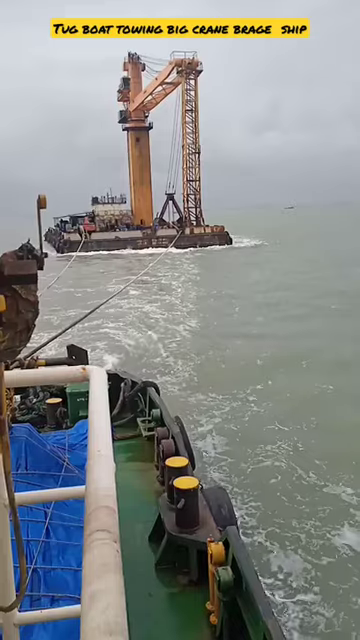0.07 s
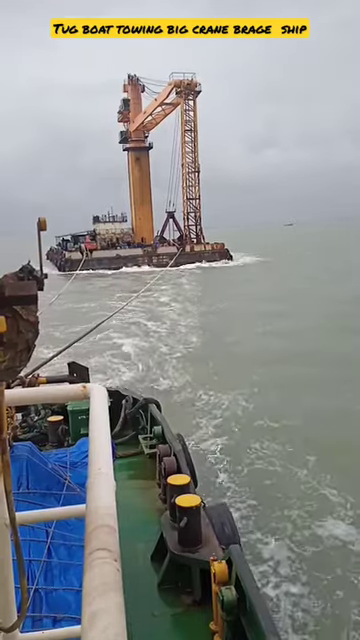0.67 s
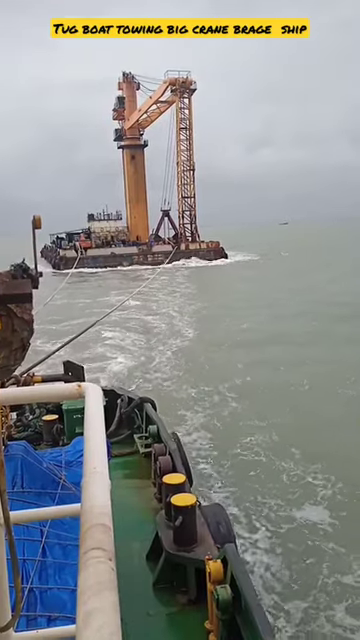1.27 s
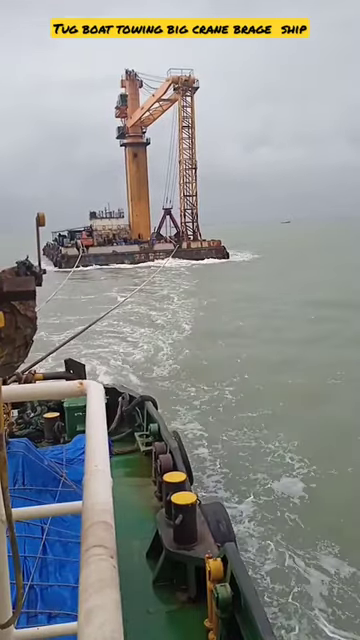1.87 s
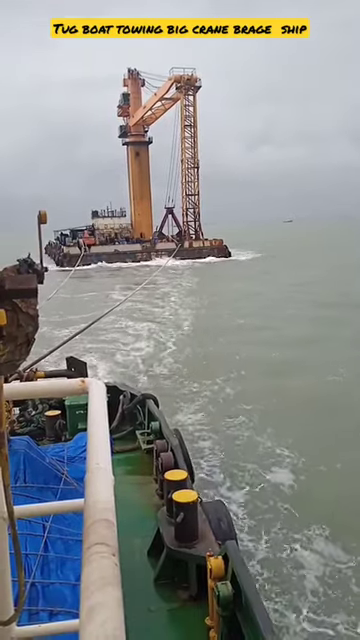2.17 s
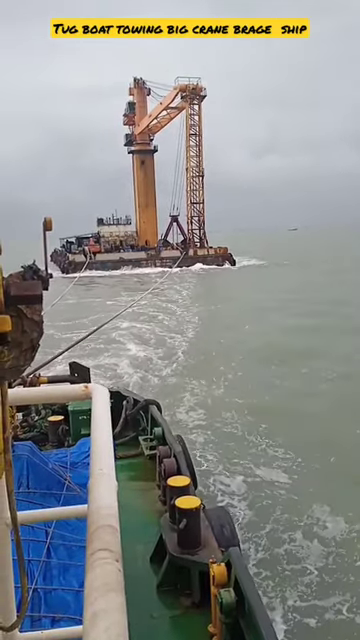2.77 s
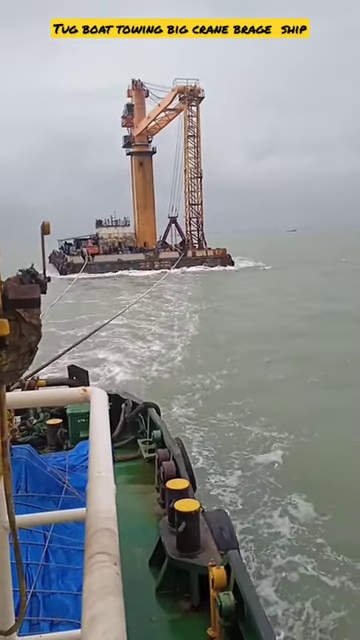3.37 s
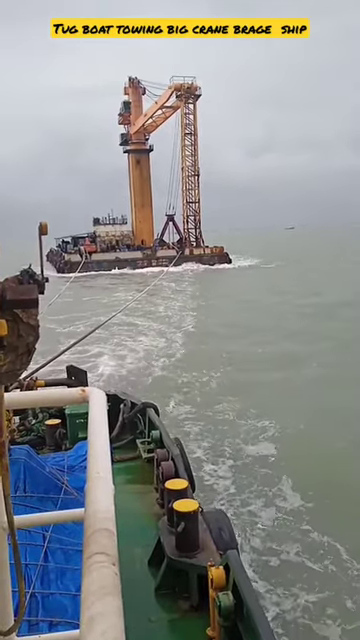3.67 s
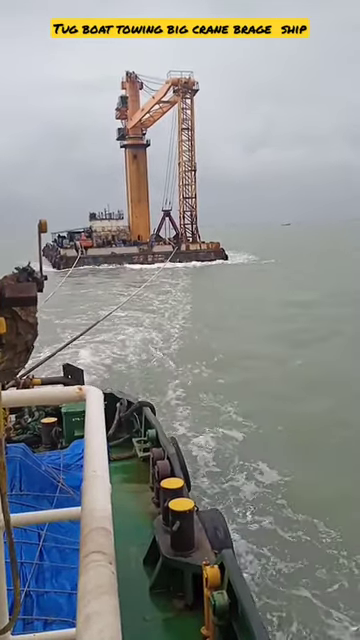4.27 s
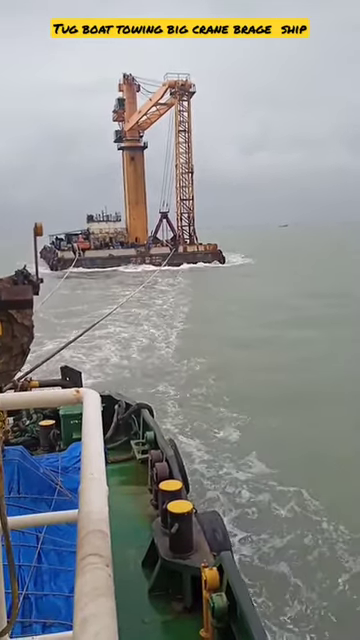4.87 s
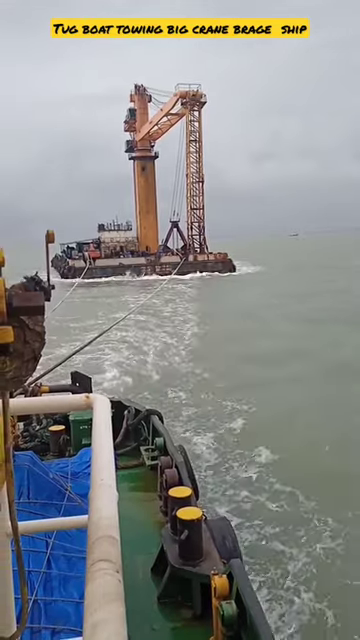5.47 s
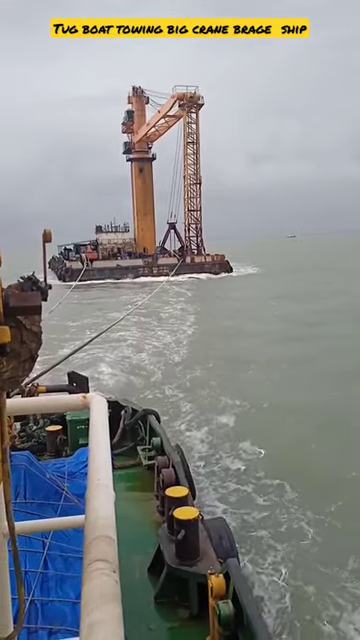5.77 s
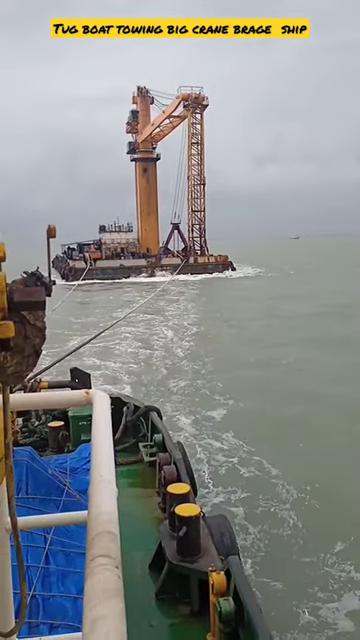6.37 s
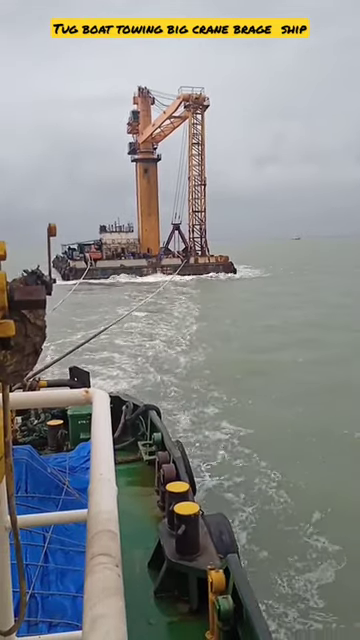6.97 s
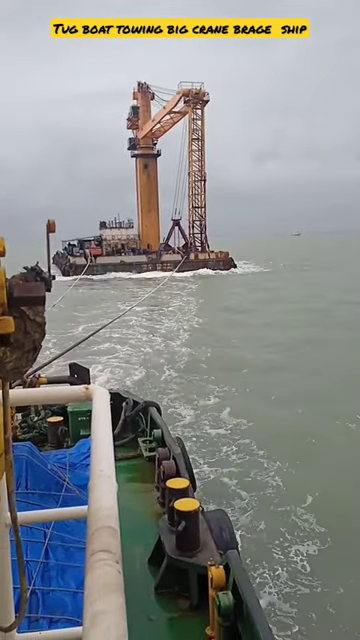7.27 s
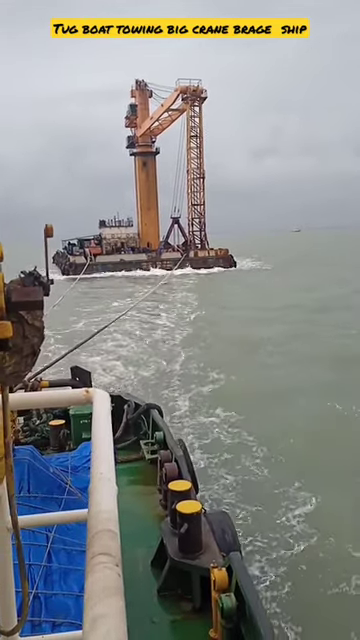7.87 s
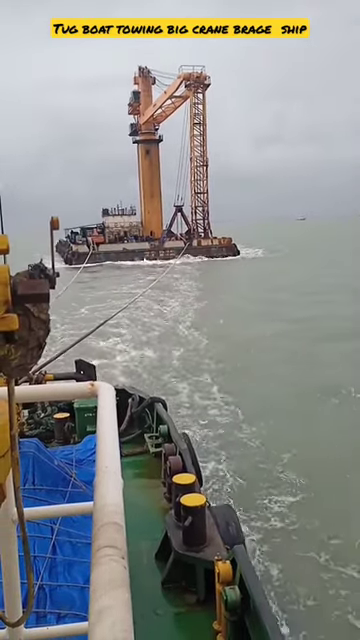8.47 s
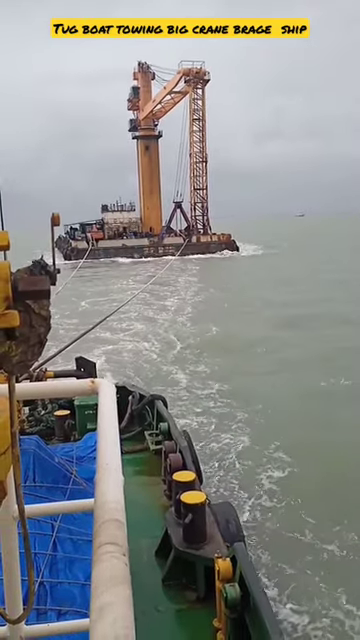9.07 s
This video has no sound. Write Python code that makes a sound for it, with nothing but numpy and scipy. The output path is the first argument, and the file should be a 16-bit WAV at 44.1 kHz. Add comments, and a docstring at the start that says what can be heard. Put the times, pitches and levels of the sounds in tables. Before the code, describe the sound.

Low, pulsing boat engines rumble with a faint whine, gusts of wind and light splashes of water.

```python
"""On deck, tugboat towing a barge

One microphone in the open air, close to the engines. Two diesels run at almost the same speed, so their
exhaust notes throb about three times a second, under a steady gear whine and the engine room's roar.
Wind buffets and bumps the microphone; the wake fizzes and splashes along the hull. The sound fades in."""
import sys
import numpy as np
from scipy import signal
from scipy.fft import rfft, irfft, next_fast_len
from scipy.io import wavfile
from scipy.ndimage import uniform_filter1d, map_coordinates

SR = 44100
rng = np.random.default_rng(int(sys.argv[2]) if len(sys.argv) > 2 else 0)


def unload_audio(sound):
    """Save the sound as a 16-bit wav file, at the path given as the first command line argument."""
    columns = np.transpose(np.atleast_2d(sound))
    # keep every value between -1 and 1, then stretch to whole-number steps
    steps = np.round(np.clip(columns, -1, 1) * 32767)
    wavfile.write(sys.argv[1], SR, steps.astype(np.int16))


N = 402191

FIRING_ORDER, WHINE_ORDER = 6, 42  # firings and whine cycles per turn of the shaft
# Rushing water and fine spray as the microphone colours them, with its resonance near 15 kHz:
# frequency_hz, relative_db
WASH_SPECTRUM = [(1500, -11), (2800, 3), (3500, -2), (4050, -2.5), (4800, -5), (5600, 2.5), (6000, 0),
                 (6600, 3), (7300, -0.5), (8200, -8.5), (11000, -17.5), (16000, -36)]
SPRAY_SPECTRUM = [(2500, -19), (6000, -4.5), (8500, -1.5), (10500, -3.5), (12200, 0.5), (12900, 3),
                  (13300, -1.5), (14000, 0), (14700, 11.5), (15500, 10)]


def amp(db):
    """Decibels to gain."""
    return 10 ** (np.asarray(db) / 20)


def unit(x):
    """Scale to rms 1."""
    return x / np.sqrt(np.mean(x ** 2) + 1e-20)


def curves(rows):
    """One value per sample for each column after the time."""
    times, *columns = np.transpose(rows)
    return [np.interp(np.arange(N) / SR, times, column) for column in columns]


def wobble(rate):
    """A smooth random curve, rate knots a second."""
    knots = rng.standard_normal(int(N * rate / SR) + 4)
    fine = np.arange(10 * len(knots)) / 10
    return np.interp(np.arange(N) * rate / SR, fine, map_coordinates(knots, [fine]))


def filtered(x, response):
    """Filter x by a gain given as a function of frequency."""
    size = next_fast_len(N + SR // 2)
    return irfft(rfft(x, size) * response(np.fft.rfftfreq(size, 1 / SR)), size)[:N]


def coloured(x, spectrum):
    """x shaped by (Hz, dB) points on a log axis, at rms 1."""
    hz, db = np.transpose(spectrum)
    return unit(filtered(x, lambda f: amp(np.interp(np.log(f + 1), np.log(hz), db))))


def noise():
    """White noise of rms 1."""
    return rng.standard_normal(N)


def patchy(depth_db):
    """White noise whose level varies in small patches of time and frequency."""
    spectrogram = signal.stft(noise(), nperseg=512)[2]
    patches = uniform_filter1d(rng.standard_normal(spectrogram.shape), size=4, axis=0)
    patches = uniform_filter1d(patches, size=5, axis=1)
    return signal.istft(spectrogram * amp(depth_db * unit(patches)), nperseg=512)[1][:N]


def add(track, start_s, sound):
    """Mix a short sound into the track."""
    part = track[round(start_s * SR):][:len(sound)]
    part += sound[:len(part)]


def sea():
    """Gains of wash and spray: the churning wake, plus waves that build to a crest and drain away."""
    # How hard the wake churns: time_s, wash_db
    churn = [(0.4, -68), (1.3, -69.5), (2.6, -67.5), (3.5, -69.5), (4.8, -67.5), (5.7, -67.5), (6.5, -68),
             (7.4, -65.5), (7.9, -68.5), (9.1, -67)]
    # Waves breaking against the hull: crest_s, rise_s, fall_s, wash_db, spray_db
    waves = [(0.48, 0.09, 0.068, -69, -77.5), (1.73, .07, .05, -64, -70), (4.05, .17, 0.23, -57, -60.5),
             (4.39, 0.065, .13, -62.5, -72), (5.58, .04, .17, -64, -60.5), (8.34, .04, .06, -60, -68),
             (8.8, .13, .13, -67, -62), (9.03, 0.022, 0.065, -80, -63.5)]
    calm_wash_db, calm_spray_db, spray_db_per_db = -68, -74, 1.7  # spray grows faster than wash
    t = np.arange(N) / SR
    churn_db, = curves(churn)
    wash_power = amp(churn_db) ** 2
    spray_power = amp(calm_spray_db + spray_db_per_db * (churn_db - calm_wash_db)) ** 2
    for crest_s, rise_s, fall_s, wash_db, spray_db in waves:
        crest = np.exp(-np.abs(t - crest_s) / np.where(t < crest_s, rise_s, fall_s))
        wash_power += (amp(wash_db) * crest) ** 2
        spray_power += (amp(spray_db) * crest) ** 2
    return np.sqrt(wash_power), np.sqrt(spray_power)


def bubbles(per_s, pitch_hz, spread_db, cycles):
    """Bursting foam: each bubble rings for a few cycles at its own pitch, some far louder than most."""
    count = int(per_s * N / SR)
    when, size = rng.random((2, count))
    hz = np.clip(pitch_hz * np.exp(.35 * rng.standard_normal(count)), 1000, SR / 2.5)[:, None]
    age = np.arange(SR // 250)
    gain = amp(spread_db * np.minimum(-np.log(1 - size), 4))[:, None]
    rings = gain * np.sin(2 * np.pi * hz * age / SR) * np.exp(-hz * age / SR / cycles)
    where = (when * N).astype(int)[:, None] + age
    return unit(np.bincount(where.ravel(), rings.ravel(), N)[:N])


def wake(wash_trim_db, spray_trim_db, wash_foam_db, spray_foam_db):
    """Churned water rushes and sloshes along the hull, with foam bursting on top."""
    wash_gain, spray_gain = sea()
    slosh = wobble(22)
    foam = bubbles(per_s=1100, pitch_hz=8030, spread_db=2.5, cycles=4.9)
    rush = patchy(depth_db=1.7) * amp(wobble(90)) + amp(wash_foam_db) * foam
    fizz = patchy(depth_db=2.5) * amp(2.8 * wobble(160)) + amp(spray_foam_db) * foam
    wash = wash_gain * amp(wash_trim_db + 0.5 * slosh) * coloured(rush, WASH_SPECTRUM)
    spray = spray_gain * amp(spray_trim_db + 0.3 * slosh) * coloured(fizz, SPRAY_SPECTRUM)
    return wash + spray


def splashes(trim_db, t60_s):
    """Thrown water lands with short, bright spats."""
    # Water landing: start_s, level_db
    landings = [(1.73, -53), (4.34, -46.5), (5.0665, -49.5), (5.21, -52), (5.5638, -37), (5.94, -50),
                (6.01, -49.5), (6.9536, -53), (8.2641, -50.5), (8.8037, -43.5), (8.9, -50), (9.0236, -43),
                (9.0733, -43.5)]
    envelope = np.zeros(N)
    t = np.arange(SR // 8) / SR
    attack = 1 - np.exp(-t / .001)
    for start_s, level_db in landings:
        add(envelope, start_s, amp(level_db + trim_db - 60 * t / t60_s) * attack)
    return envelope * unit(coloured(noise(), SPRAY_SPECTRUM) + 0.36 * coloured(noise(), WASH_SPECTRUM))


def drips(t60_s):
    """A large falling drop traps an air bubble that rings briefly."""
    # The drop's plink: start_s, peak_db, pitch_hz
    plinks = [(4.055, -34, 2600)]
    out = np.zeros(N)
    t = np.arange(SR // 20) / SR
    for start_s, peak_db, pitch_hz in plinks:
        add(out, start_s, amp(peak_db - 60 * t / t60_s) * np.sin(2 * np.pi * pitch_hz * t))
    return out


def wind(trim_db, gust_trim_db, lumpy_db, spiky_db):
    """Wind and gusts buffet the microphone; the turbulence comes in lumps with brief pressure spikes."""
    # Wind between gusts: time_s, level_db
    breeze = [(0.4, -31.5), (2.7, -31.5), (3.2, -31.5), (4.4, -32.5), (4.9, -32.5), (6.85, -34.5),
              (7.6, -29.5), (8.05, -28.5), (8.4, -32), (9.1, -38)]
    # Gusts that swell and die: crest_s, length_s, level_db
    gusts = [(0.522, 0.097, -27.5), (1.153, .14, -29), (2.27, 0.12, -29), (3.777, 0.077, -26),
             (4.42, 0.34, -30), (4.64, 0.24, -29.5), (5.15, 0.18, -29), (5.41, .14, -31.5),
             (5.69, .18, -25), (6.303, 0.095, -29.5), (6.566, 0.3, -27.5), (7.022, 0.063, -21.5),
             (7.29, 0.22, -27), (7.627, 0.16, -25.5), (7.836, .1, -22.5), (7.957, .12, -20),
             (8.164, 0.049, -24), (8.644, 0.15, -31.5)]
    # Buffeting at the microphone: frequency_hz, relative_db
    buffet_spectrum = [(20, -31.5), (35, -22), (60, -11.5), (85, 0.5), (105, 1), (150, -2.5), (240, -6),
                       (350, -11.5), (500, -17), (800, -29), (1400, -40.5), (3000, -76)]
    t = np.arange(N) / SR
    breeze_db, = curves(breeze)
    power = amp(breeze_db) ** 2
    for crest_s, length_s, level_db in gusts:
        power += amp(level_db + gust_trim_db) ** 2 * np.exp(-(2 * (t - crest_s) / length_s) ** 2)
    eddies = noise() * amp(lumpy_db * wobble(30) + spiky_db * wobble(300))
    return amp(trim_db) * np.sqrt(power) * coloured(eddies, buffet_spectrum)


def bumps(trim_db, pop_hz, thud_hz):
    """A strong eddy gives a sharp suction dip inside a broader one, flanked by pressure humps."""
    # Eddies hitting the microphone: centre_s, pop_db, thud_db
    hits = [(1.128, -30, -24), (2.241, -31.5, -27), (2.302, -25, -21), (2.388, -42, -24), (3.571, -24, -28),
            (3.668, -29.5, -30), (4.658, -24, -21), (5.699, -29, -29), (6.548, -25.5, -30),
            (6.635, -28, -28), (7.4, -28, -23), (7.812, -26.5, -19), (7.984, -21.5, -17),
            (8.165, -27.5, -19.5)]
    out = np.zeros(N)
    t = np.arange(-SR // 50, SR // 50) / SR
    dip = lambda hz: (2 * (np.pi * hz * t) ** 2 - 1) * np.exp(-(np.pi * hz * t) ** 2)
    for centre_s, pop_db, thud_db in hits:
        add(out, centre_s + t[0], amp(pop_db) * dip(pop_hz) + amp(thud_db) * dip(thud_hz))
    return amp(trim_db) * out


def engine_room(level_db, clatter_db):
    """The engine room's roar, with a few narrow, fuzzy engine hums above it."""
    # The roar as heard on deck: frequency_hz, relative_db
    room_spectrum = [(150, -18), (400, 4.5), (650, -2.5), (880, 2.5), (1000, -3.5), (1380, -2.5),
                     (1530, 0.5), (1780, -1.5), (2000, -7.5), (2400, -14), (3000, -20), (3550, -27),
                     (4050, -22.5), (5000, -29), (9000, -57)]
    # Narrow, fuzzy engine hums: pitch_hz, width_hz, level_db
    hums = [(371.3, 15, -49.5), (1546, 73, -59), (1754, 18, -60)]
    roar = patchy(depth_db=2.0) * amp(clatter_db * wobble(250))
    out = amp(level_db) * coloured(roar, room_spectrum)
    for pitch_hz, width_hz, hum_db in hums:
        hum = filtered(noise(), lambda f: 1 / (1 + (2 * (f - pitch_hz) / width_hz) ** 2))
        out += amp(hum_db) * unit(hum)
    return out


def whine(turns, trim_db, waver_db, drift_cycles):
    """The gearing sings on one high order of its shaft, wavering in level and phase."""
    # Strength of the whine: time_s, level_db
    strength = [(0.4, -48.5), (0.65, -46), (1.45, -51), (2.7, -45.5), (3.8, -50), (4.3, -48.5), (7.4, -47),
                (9.1, -49)]
    level_db, = curves(strength)
    tone = unit(np.sin(2 * np.pi * (WHINE_ORDER * turns + drift_cycles * wobble(5))))
    return amp(level_db + trim_db + waver_db * wobble(11)) * tone


def exhaust_rumble(throb_db, level_db, throb_share, lumpy_db):
    """Turbulent exhaust gas rumbles in random lumps and partly follows the throb."""
    # Exhaust noise: frequency_hz, relative_db
    exhaust_spectrum = [(20, -33.5), (35, -21.5), (62, -2), (85, -3.5), (105, 2.5), (130, -4.5),
                        (160, -9.5), (250, -10.5), (400, -28.5), (600, -22), (1000, -50.5), (2000, -63.5)]
    gain = amp(level_db + throb_share * throb_db + lumpy_db * wobble(16))
    return gain * coloured(noise(), exhaust_spectrum)


def shaft_turns(speed, in_step_s=3.97):
    """Turns of a crankshaft, counted from a moment when both engines fire together."""
    turns = np.cumsum(speed) / SR
    return turns - turns[round(in_step_s * SR)]


def diesel(turns, tones, swell_db):
    """Tones locked to one crankshaft; a four-stroke cycle allows whole and half orders."""
    out = np.zeros(N)
    for multiple, level_db, unsteady_db in tones:
        order = np.round(2 * multiple) / 2
        # the weaker orders arrive by shifting paths
        lag_cycles = 0 if order == FIRING_ORDER else rng.random() + 0.07 * wobble(5)
        waver_db = unsteady_db * (wobble(24) + 0.54 * wobble(2.9))
        tone = np.sin(2 * np.pi * (order * turns + lag_cycles))
        out += amp(level_db) * unit(tone * amp(waver_db))
    return amp(swell_db) * out


def engines(beat_db, waver_db, flutter_db):
    """Two diesels beat: the exhaust note swells as they come into step and sags as they part."""
    # Crankshaft speeds: time_s, leading_rev_per_s, second_rev_per_s
    shaft_speeds = [(0.3, 17.744, 17.21), (1.0, 17.766, 17.297), (1.5, 17.75, 17.27), (2.0, 17.837, 17.226),
                    (2.6, 17.794, 17.233), (3.5, 17.794, 17.213), (4.2, 17.847, 17.229),
                    (5.0, 17.784, 17.231), (5.8, 17.792, 17.185), (6.6, 17.763, 17.276),
                    (7.4, 17.791, 17.198), (8.1, 17.804, 17.218), (8.6, 17.715, 17.193),
                    (9.1, 17.825, 17.207)]
    # Each engine's tones: shaft_multiple (before rounding to halves), level_db, unsteady_db
    leading_tones = [(4.5, -53, 0.5), (5, -50.5, -1), (6, -32, 0.54), (6.5, -47, 0.5), (7.5, -47.5, 2),
                     (10.5, -50, 2.5), (12, -54, 0), (21, -49, 1.5), (83.7, -67, 2.5)]
    second_tones = [(5, -52.5, 1.9), (6, -36.5, 0.46), (7, -44, 1.1), (8, -45, 2.6), (42.3, -61.5, 1.3)]
    leading, second = map(shaft_turns, curves(shaft_speeds))
    in_step = np.cos(2 * np.pi * FIRING_ORDER * (leading - second))
    throb_db = beat_db * in_step + waver_db * wobble(2.9)
    uneven_db = flutter_db * np.cos(np.pi * leading)  # uneven cylinders: one flutter every two turns
    tones = diesel(leading, leading_tones, throb_db + uneven_db) + diesel(second, second_tones, throb_db)
    gears = whine(leading, trim_db=1.2, waver_db=2.1, drift_cycles=.06)
    rumble = exhaust_rumble(throb_db, level_db=-39.0, throb_share=0.62, lumpy_db=2.1)
    return tones + gears + rumble


def scene():
    """Engines, wind and water at one microphone on deck."""
    boat = engines(beat_db=2, waver_db=0.7, flutter_db=2.5)
    boat += engine_room(level_db=-46.5, clatter_db=-0.3)
    air = wind(trim_db=-2.5, gust_trim_db=0.5, lumpy_db=2.5, spiky_db=3.0)
    air += bumps(trim_db=1.1, pop_hz=626, thud_hz=260)
    water = wake(wash_trim_db=-0.5, spray_trim_db=4.5, wash_foam_db=-10.5, spray_foam_db=-0.5)
    water += splashes(trim_db=-0.5, t60_s=0.033) + drips(t60_s=0.0071)
    return (boat + air + water)[None]


def record(dry):
    """A short fade-in, and nothing above 15.6 kHz."""
    # Opening fade: time_s, gain
    fade_in = [(.168, 0), (.45, 1)]
    fade, = curves(fade_in)
    return filtered(dry[0] * fade, lambda f: f < 15600)[None]


dry = scene()
out = record(dry)
unload_audio(out)
```